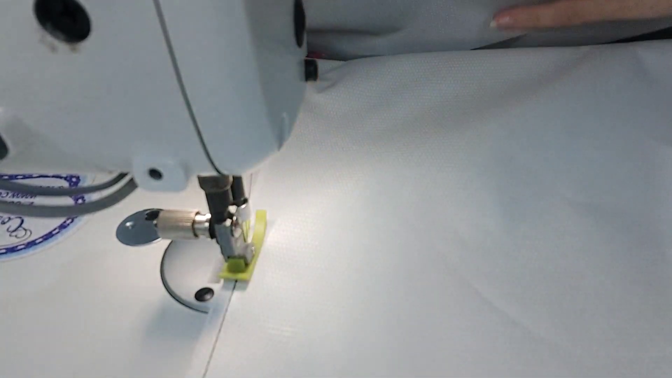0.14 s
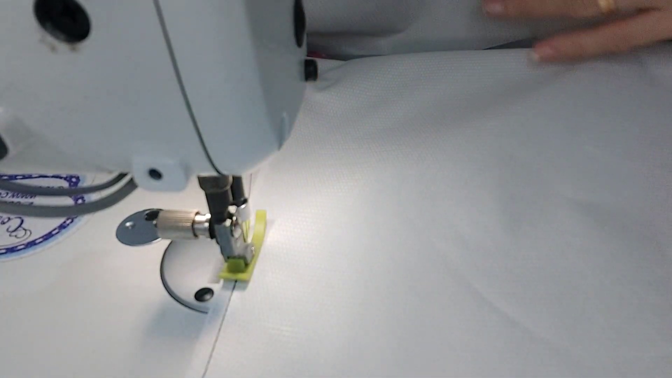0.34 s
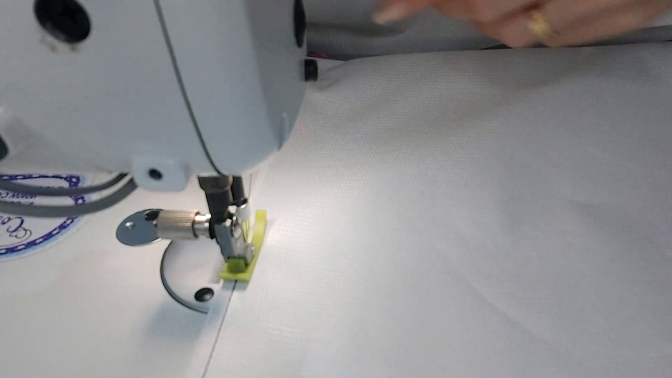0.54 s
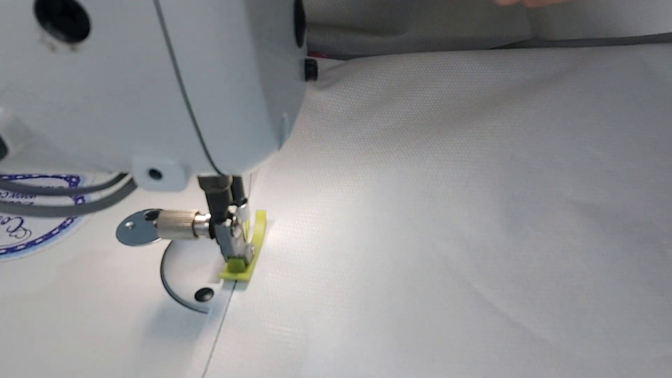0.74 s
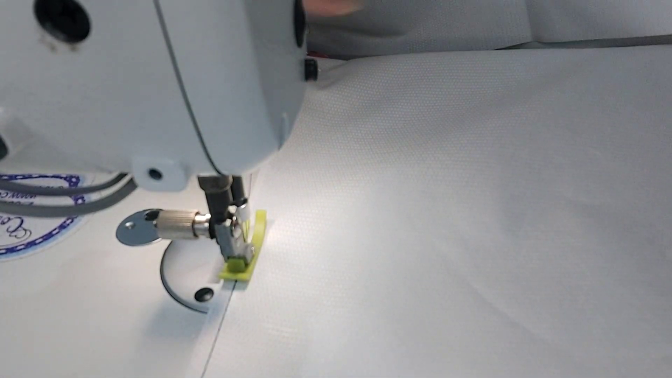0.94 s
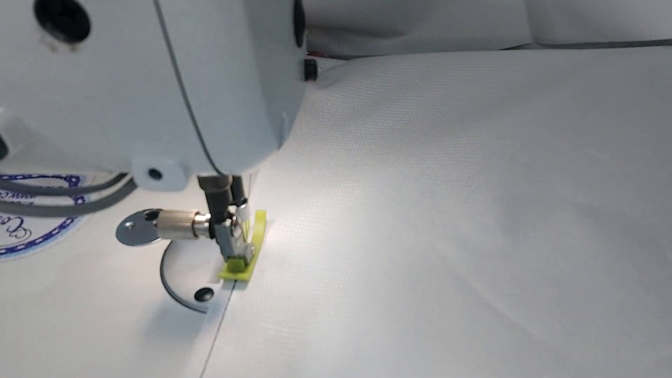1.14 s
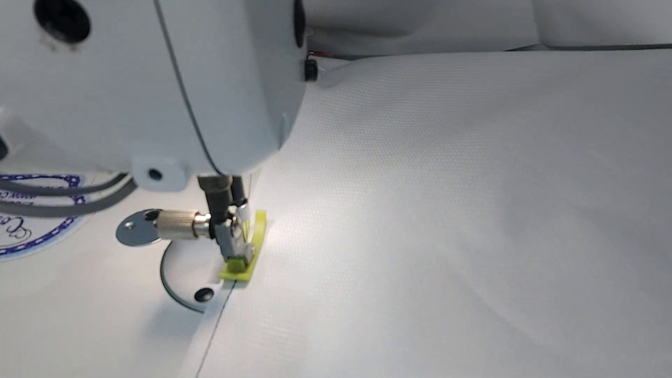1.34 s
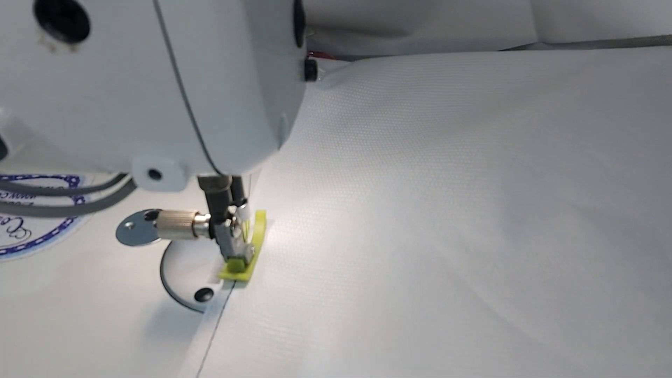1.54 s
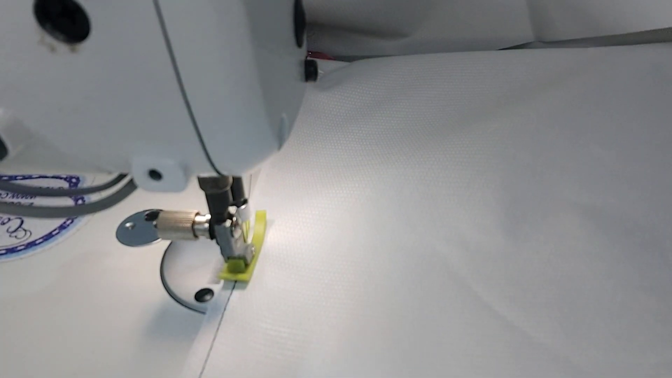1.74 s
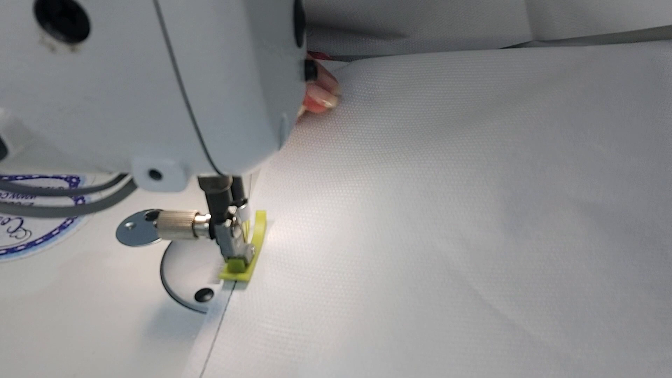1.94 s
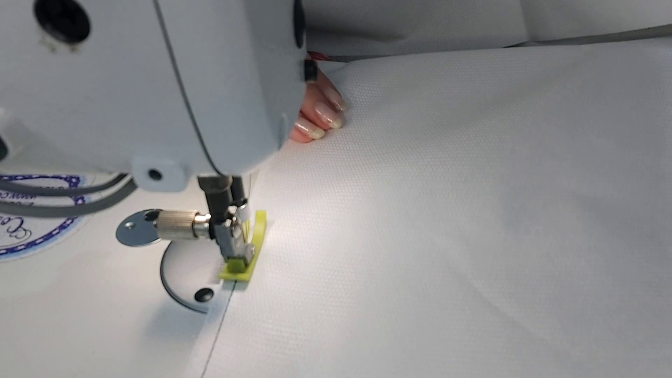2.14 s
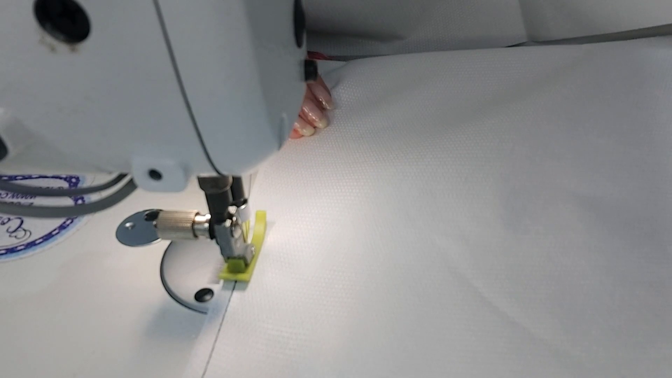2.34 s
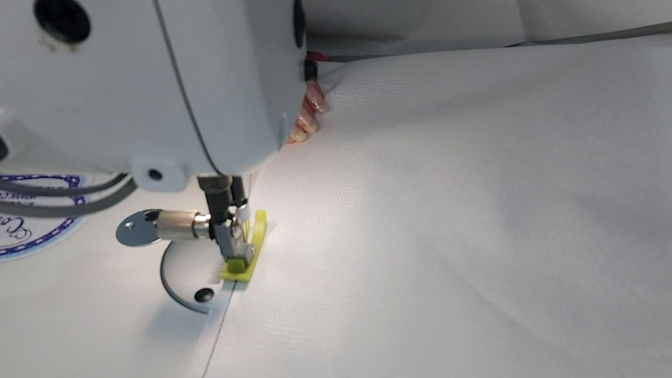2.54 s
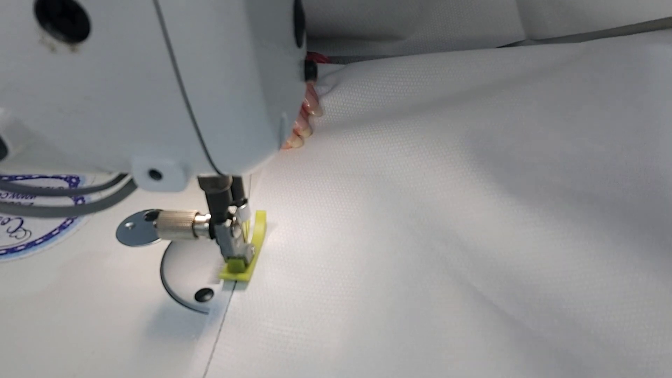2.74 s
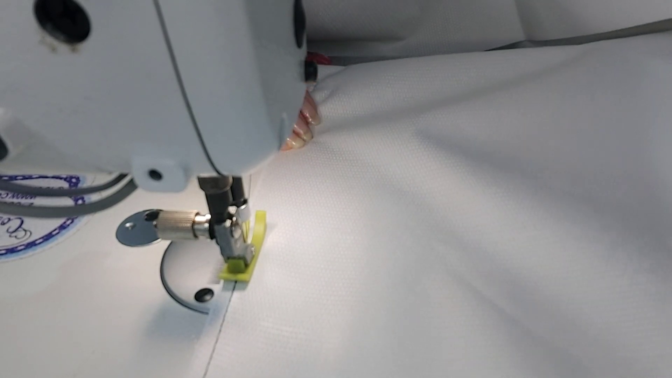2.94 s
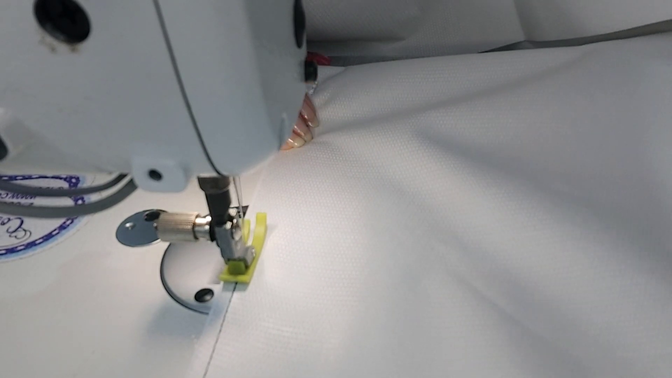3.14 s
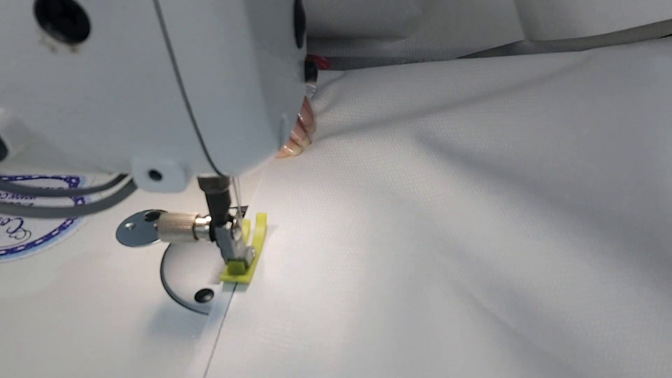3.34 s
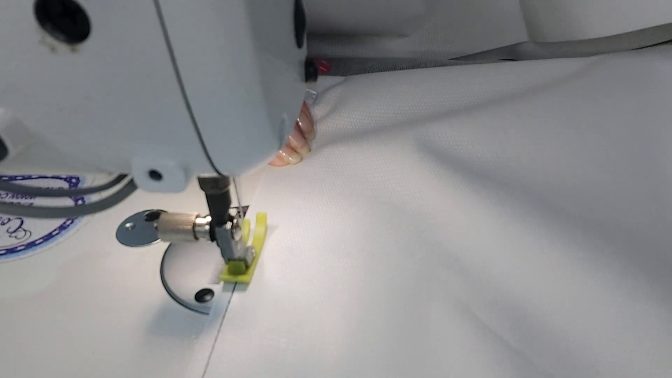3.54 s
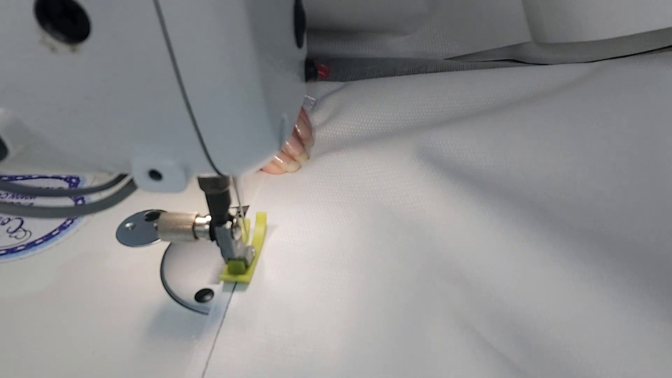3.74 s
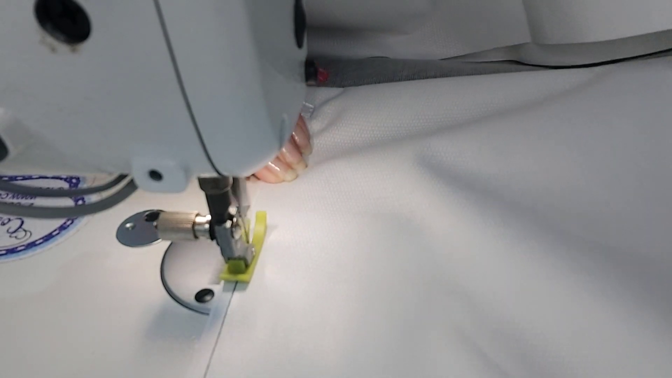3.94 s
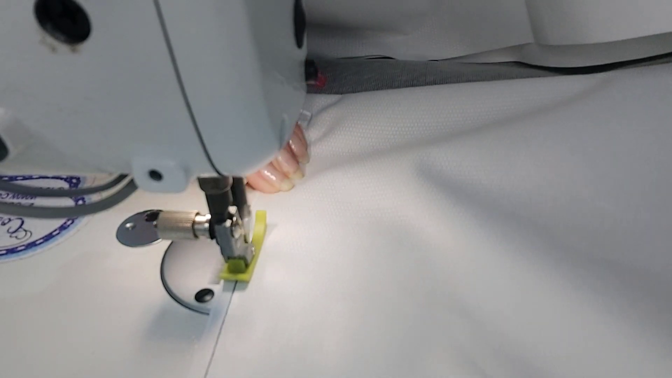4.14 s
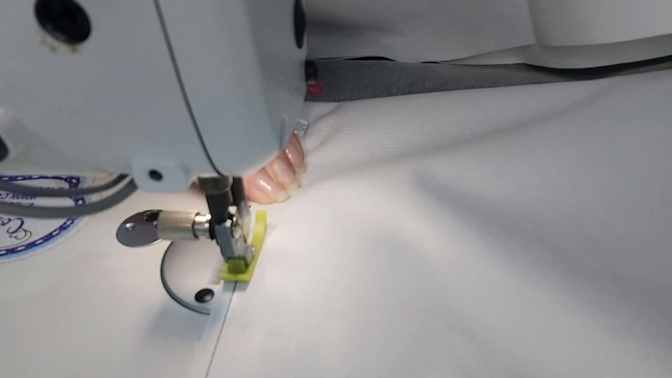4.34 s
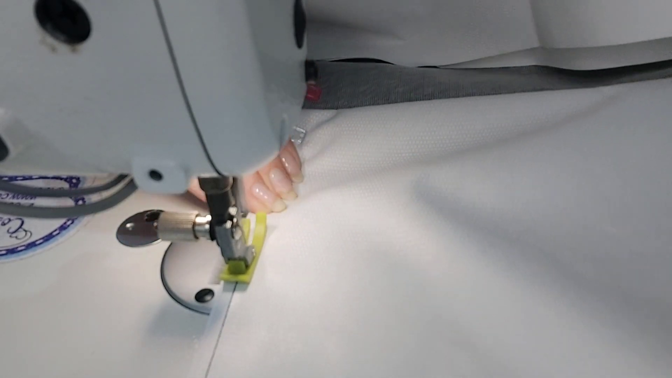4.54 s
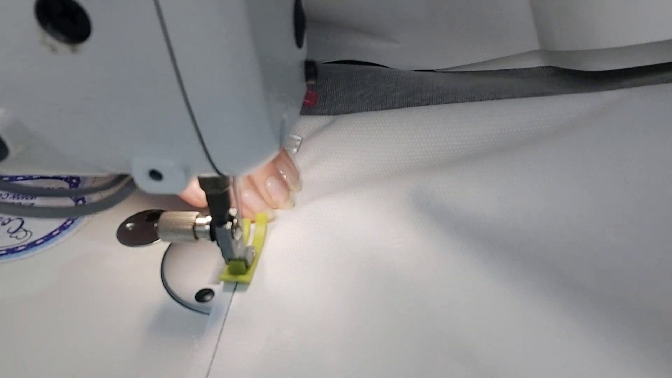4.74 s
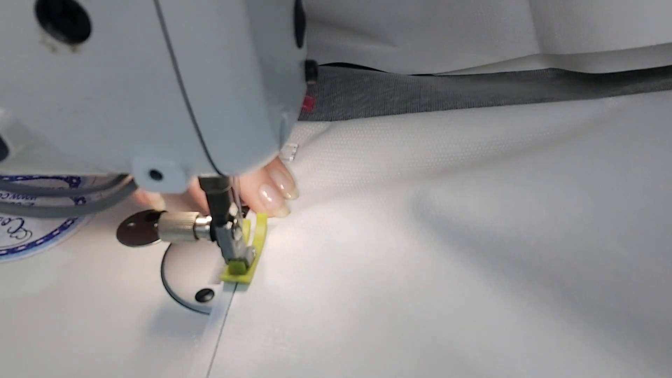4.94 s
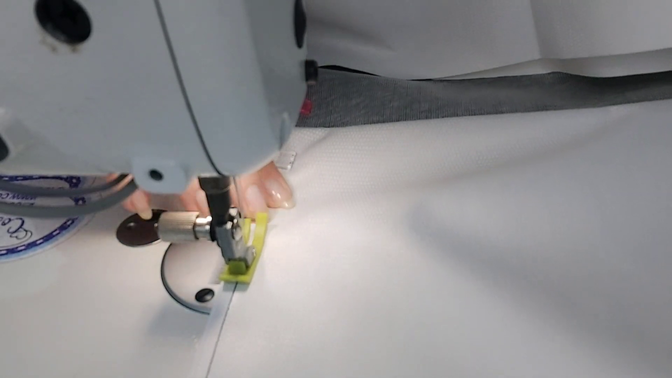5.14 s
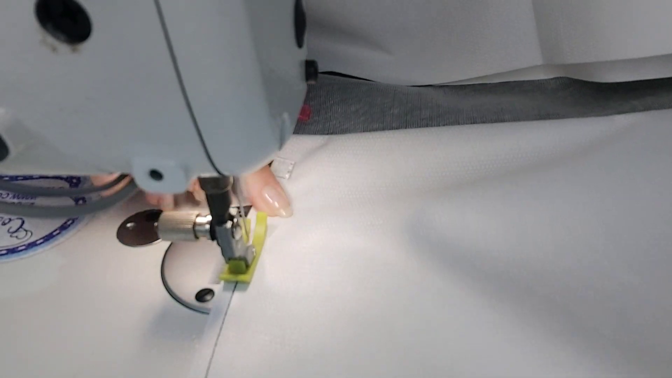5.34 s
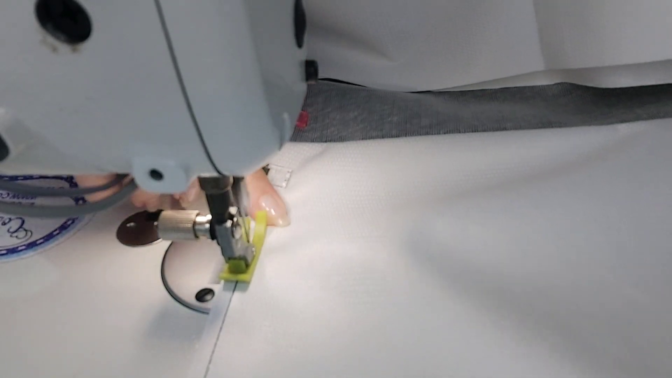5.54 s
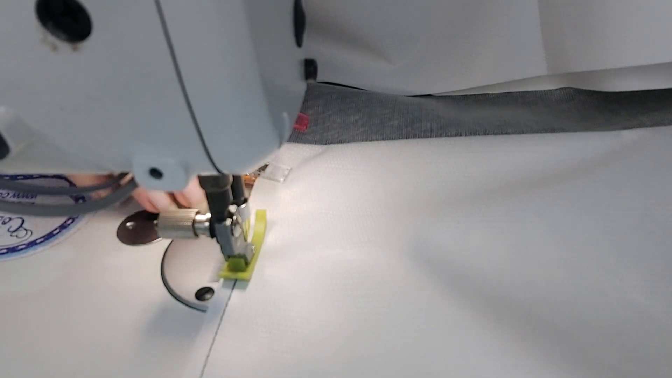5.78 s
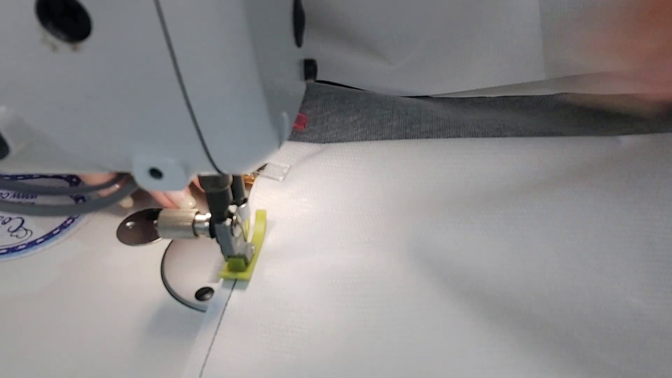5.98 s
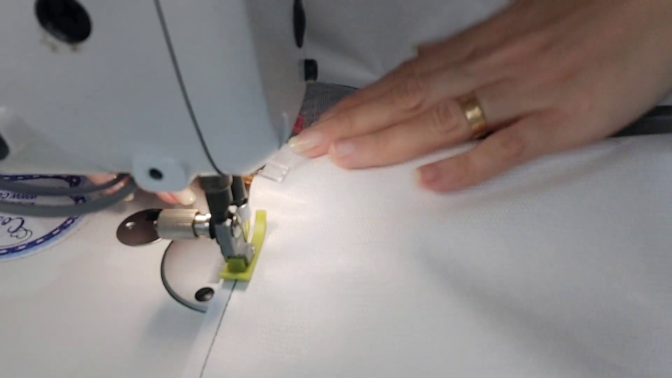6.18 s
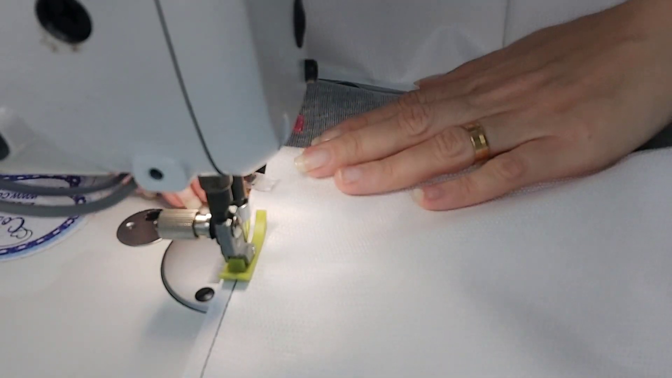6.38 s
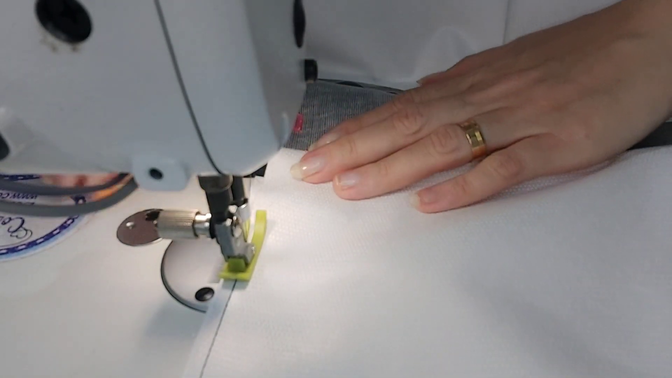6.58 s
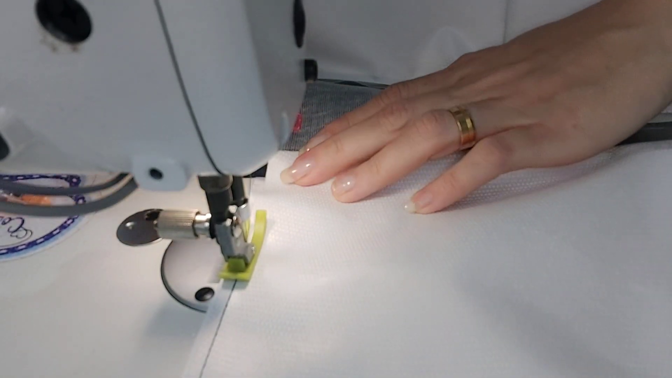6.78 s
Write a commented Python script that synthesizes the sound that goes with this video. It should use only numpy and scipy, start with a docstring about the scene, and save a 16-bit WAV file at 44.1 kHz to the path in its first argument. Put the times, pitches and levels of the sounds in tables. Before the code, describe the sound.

Soft fabric rustles and light knocks over faint hum, then about two seconds of rapid, clattering machine stitching, a heavy stop, and tiny metallic clinks.

```python
"""Hands slide over cloth, among small ticks and dull knocks, above a mains hum and quiet room air. Close to a
stereo microphone an industrial sewing machine then sews 25 stitches, about eleven a second, and brakes; hands
and cloth return and steel snips clink. Impacts are force pulses driving damped modes or decaying bands of
noise. Each stitch is a click, a rattle, a knock in the arm, a thump in the table and a bright fizz; gears whirr
as noise and sing steady tones."""
import sys
import numpy as np
from scipy import signal
from scipy.fft import rfft, irfft, next_fast_len
from scipy.io import wavfile
from scipy.ndimage import uniform_filter1d

SR = 44100
rng = np.random.default_rng(int(sys.argv[2]) if len(sys.argv) > 2 else 0)


def wav_out(sig):
    """Save sig, one row per channel (or a flat mono array), as 16-bit PCM at SR to the path in sys.argv[1]."""
    wavfile.write(sys.argv[1], SR, np.round(np.clip(np.atleast_2d(sig).T, -1, 1) * 32767).astype(np.int16))


N = 300321
TIME = np.arange(N) / SR  # s
SIDES = np.array([[.5], [-.5]])  # left and right halves of a level or phase difference

# Levels are settings before any trim in the functions; mode t60 is before the share that ring() keeps of it.
# One row a stitch, in order: [knock level/dB, low arm ring above high/dB, fizz delay after the click t/ms,
# fizz level/dB, loudest clack delay t/ms, clack level/dB]
STITCH_ROWS = [(-33, -2, 65, -25, 17, -33), (-41, -8, 55, -27.5, 14, -36), (-34, 5, 57, -30, 33, -28),
               (-38, 3, 62, -30, 23, -30), (-35, 1, 47, -34, 10, -29), (-36, 2, 56, -36, 25, -30),
               (-37, 3, 58, -33, 21, -30), (-31, -3, 53, -35, 33, -27), (-29, -3, 63, -25, 17, -28),
               (-30.5, -2, 62, -32, 7.6, -31), (-34, -12, 61, -28, 18, -27), (-30, -1, 59, -26, 17, -32),
               (-35, 9, 61, -33, 24, -28), (-29, -4, 54, -31, 20, -30), (-33, -16, 50, -36, 17, -32),
               (-39, -1, 60, -31, 10, -33), (-30, 2, 68, -29, 33, -30), (-29, -5, 66, -24.5, 18, -32),
               (-34, 3, 50, -32, 22, -27), (-36, 11, 62, -27, 33, -29), (-30, 1, 59, -30, 20, -29),
               (-39, -2, 64, -28, 22, -30), (-29, 1, 52, -33, 17, -29), (-29, 5, 62, -28, 16, -30),
               (-31, 4, 50, -38, 20, -27)]
# Loose parts after the click: [delay t/ms, level/dB relative to the rattle]
RATTLE_BLOWS = [(9, 2.5), (14, -1.5), (21, -2), (27, -1.5), (34, -11)]
# Blows in the arm, the main one a quick chatter: [delay t/ms, level/dB relative to the knock]
ARM_BLOWS = [(9, -15), (14.5, -13), (18.7, -3), (20.4, -1), (22.1, -3), (57.5, -4)]
# Blows into the table: [delay t/ms, level/dB relative to the thump]
TABLE_BLOWS = [(43, -3.5), (53, -5.5)]
# Modes of the table, the frame struck by the brake, and the steel snips: [f/Hz, level/dB, t60/s]
TABLE_MODES = [(74, -15, 0.15), (100.3, -6.5, 0.17), (174.5, -2.5, 0.15), (190.4, 4.5, 0.15),
               (268, -5, 0.031)]
FRAME_MODES = [(70, -17, .1), (142, -8, .09), (250, 0, .06), (355, -5, .13), (430, -9, .1), (600, -6, .07),
               (807, -12, .06), (1100, -12, .09), (1716, -18, 1.3), (4300, -12, .05)]
SNIP_MODES = [(3044, -30, 0.13), (4270, -19, 0.02), (5320, -15, 0.067), (7300, -24, .1), (8340, -26, .03),
              (9400, -1.5, .04), (11200, -7, 0.04), (11790, -8, 0.054), (12800, -16, .015),
              (14150, -5, 0.035)]
# Modes of the small steel levers, the dull housing and the jingling steel parts: [f/Hz, level/dB, t60/s]
LEVER_MODES = [(1105, -15, 0.064), (1355, -14.5, 0.065), (1734, -14, 0.18), (2157, -6.5, 0.055),
               (2505, -11, 0.059), (2767, -11.5, 0.048), (4230, -6.5, 0.024), (5500, -5, 0.024),
               (8460, -4.5, 0.025), (8990, -3, 0.037), (11470, -4.5, 0.032)]
HOUSING_MODES = [(535, -10.5, 0.037), (568, -0.5, 0.018), (786, -18, 0.042), (1235, -10, 0.033),
                 (1804, -19.5, 0.05), (2530, -25.5, 0.046)]
JINGLE_MODES = [(3900, -20, .02), (4680, -10, 0.22), (5250, -14, .03), (9200, -3, .02), (10300, -2, .025),
                (11600, -2, .02), (12800, -4, .02), (14200, -9, .015)]
# The small part that ticks at each click: [f/Hz, level/dB relative to the click, t60/s]
CATCH_MODES = [(5460, -7.5, 0.029)]
# Low pair of the stand, struck in opposite senses so that it beats: [f/Hz, level/dB, t60/s]
STAND_MODES = [(238.5, -8, .55), (266.3, -9, .55)]
# Lower and upper modes of the arm: [f/Hz, level/dB, t60/s]
ARM_LOW_MODES = [(500, -9, .1), (521, -2, .2)]
ARM_HIGH_MODES = [(598, -2, .2), (622, -6, .14)]
# A part closes on the arm and stifles its ring: [time after the click t/ms, level/dB]
ARM_DAMPING = [(35, 0), (41, -9)]
# Narrow tones of the turning gears: [f/Hz, width/Hz before the share of t60, level/dB relative to the whirr]
GEAR_TONES = [(8860, 70, -20)]
# Steady tones of the meshing gears: [f/Hz, level/dB relative to the whirr]
MESH_TONES = [(521, -12), (374, -6), (428, -10), (1716, -14)]
# Course of the running gear train: [t/s, level/dB]
WHIRR_COURSE = [(3.08, -48), (3.125, -57), (3.14, -46.5), (3.29, -45.5), (3.31, -40.5), (5.6, -39.5),
                (5.68, -41.5), (5.76, -56.5), (5.849, -65)]
# Relative noise spectra of click, fizz, metal (whirr and rattle), rumble, cloth and air: [f/Hz, level/dB per Hz]
CLICK_COLOUR = [(1000, -5), (4000, -8), (5100, -16), (5500, 1), (5900, -6.5), (7000, -8.5), (8800, -6),
                (15500, -9)]
FIZZ_COLOUR = [(3000, -16), (7500, -8), (8500, 2), (8850, 7), (9200, -1), (10500, -6.5), (15500, -14)]
METAL_COLOUR = [(410, -9), (700, -0.5), (747, -11), (1360, 1.5), (1530, -6.5), (1740, 0.5), (2150, 0.5),
                (2350, -4), (4230, -3.5), (5490, -10), (6950, -11.5), (8670, -1.5), (9630, -5.5),
                (15800, -11.5)]
RUMBLE_COLOUR = [(50, -40), (81, -10.5), (129, -13), (189, 1), (222, -10), (290, -7), (350, -16),
                 (445, -13), (560, -7), (760, -31)]
BRIGHT_CLOTH_COLOUR = [(4000, -16.5), (5400, -11.5), (6700, -18), (8000, -10.5), (10200, -4.5), (12000, -6),
                       (15800, -16)]
DULL_CLOTH_COLOUR = [(200, -1), (300, 0), (528, 2), (981, -9), (1490, -8), (2110, -9.5), (4500, -14),
                     (7500, -21.5), (10000, -27)]
AIR_COLOUR = [(30, -52), (60, -32), (108, -16.5), (203, -22), (238, -19), (271, -18.5), (392, -27),
              (581, -29), (1100, -36.5), (6500, -48.5), (11500, -52), (15000, -52), (15800, -68)]
# The table takes the first pull: [t/s, level/dB]
START_BLOWS = [(3.095, -45.5), (3.234, -40), (3.258, -38)]
# Dull knocks on the machine housing, clinks of the snips, jingles of small steel parts: [t/s, level/dB]
HOUSING_BLOWS = [(.011, -32.5), (0.015, -33.5), (0.044, -36.5), (0.049, -36), (0.055, -36), (0.135, -27),
                 (0.17, -31), (0.352, -38), (0.589, -43.5), (.066, -38), (1.485, -45), (2.647, -36.5),
                 (2.693, -40.5), (3.152, -35), (3.185, -33.5), (3.202, -28.5), (6.315, -39.5)]
CLINK_BLOWS = [(6.7195, -50), (6.746, -27), (6.7755, -37), (6.781, -29), (6.807, -36)]
JINGLE_BLOWS = [(1.3725, -33), (1.376, -32), (1.383, -25), (1.391, -30), (1.397, -29.5), (1.448, -37),
                (1.457, -37)]
# Broad clacks, most as the machine starts and stops, and a bright crackle: [t/s, level/dB]
CLACK_EVENTS = [(.854, -50), (2.045, -49.5), (3.077, -37.5), (3.098, -49), (3.133, -33), (3.144, -32.5),
                (3.157, -36), (3.184, -36), (3.219, -32.5), (5.645, -29), (5.69, -35), (6.316, -34)]
CRACKLE_EVENTS = [(1.372, -30), (1.383, -26.5), (1.45, -32.5)]
# Ticks: [t/s, level/dB, centre f/Hz]
TICK_EVENTS = [(0.043, -50, 4000), (0.137, -47, 1500), (.339, -45.5, 10600), (0.832, -36, 11200),
               (1.713, -52, 3000), (2.178, -45, 3500), (2.647, -47.5, 1700), (3.005, -46, 11300),
               (5.623, -41, 4100), (5.69, -29.5, 4040), (5.706, -35, 4270), (6.413, -32, 1740),
               (6.413, -29.5, 12400), (6.706, -35.5, 10400), (6.718, -38, 10500), (6.745, -22.5, 11800)]
# Hands sliding over cloth: [start t/s, end t/s, bright level/dB, dull level/dB]
CLOTH_SLIDES = [(0, 0.08, -47.5, -46), (0.103, 0.204, -64.5, -52), (0.264, 0.377, -66, -61),
                (0.58, 0.614, -79, -55.5), (1.24, 1.398, -73, -61), (1.394, 1.486, -40.5, -58),
                (1.553, 1.783, -72, -61), (1.849, 1.934, -60, -51.5), (2.112, 2.31, -63.5, -57),
                (2.474, 2.58, -63.5, -86), (2.637, 2.732, -75, -61), (2.765, 2.832, -66, -68),
                (5.817, 5.877, -52.5, -49.5), (5.891, 6.062, -76, -56), (6.152, 6.294, -53.5, -49),
                (6.305, 6.45, -58.5, -54), (6.518, 6.67, -56.5, -68), (6.71, 6.83, -56, -66)]
# Mains hum: [f/Hz, rms level/dB before waver and panning]
HUM_TONES = [(120, -75), (240, -53), ]
# How the two channels hear a ringing part: [f/Hz, left minus right level/dB, left leads/rad]
MACHINE_PLACE = [(90, 2, -0.28), (250, 4, 0.63), (378, -7, -1.5), (547, -1.3, -1.02), (1340, -0.5, -0.31),
                 (2100, 1.5, -1.74), (4870, -2, -1.73), (7650, -8.5, -1.1), (10000, 4, -1.74)]
HAND_PLACE = [(497, 3, 0.88), (3000, -15.5, 5.9), (5560, -10.5, 2.54), (9600, 6.5, 0.92), (12900, -6, 1.9)]

FIRST_STITCH_S, STITCH_S, QUICKER_S = 3.3005, .09448, .0000416  # each interval is a little shorter than the last
CLICK_DB, RATTLE_DB, THUMP_DB = -26, -32, -29.5  # typical levels, from which the stitches scatter
CLICK_SPREAD_DB, RATTLE_SPREAD_DB, THUMP_SPREAD_DB = 1, 2.0, 0.47
LAST_THUMP_DB = -4  # the last stitch lands softer
USUAL_KNOCK_DB, RATTLE_SHARE, THUMP_SHARE = -35.5, 0.18, -0.15  # harder knock: more rattle, less thump (dB per dB)
LEVER_SPREAD_DB = 3.0  # no two contacts strike the levers at the same spot
BRAKE_S, BRAKE_DB, STAND_LAG_S = 5.645, -18.5, .004  # the jolt reaches the stand a little later
TICK_WIDTH_HZ, TICK_WIDEST, TICK_T60_S = 3900, 0.69, 0.027  # the width is at most this many times the centre
CLACK_HZ, CLACK_WIDTH_HZ, CLACK_T60_S = 6600, 10500, 0.032
CRACKLE_HZ, CRACKLE_WIDTH_HZ, CRACKLE_T60_S = 10800, 2300, 0.14
JINGLE_PAN_DB = 6.5  # added to the place of the hands
RUSTLE_DB, AIR_DB, WALLS_DB = -70, -62, -12  # faint bright stirring of cloth; room air; wall return
TOP_HZ = 15800


def stitches():
    """Periodic excitation: every stitch repeats one train of contacts, with chance in timing and strength."""
    knock, low, fizz_ms, fizz, clack_ms, clack = np.array(STITCH_ROWS, float).T[:, :, None]
    k = np.arange(len(STITCH_ROWS))[:, None]
    starts = FIRST_STITCH_S + STITCH_S * k - QUICKER_S * k ** 2 / 2
    uneven = rng.standard_normal((3, len(starts), 1))
    excess = knock - USUAL_KNOCK_DB
    click = CLICK_DB + CLICK_SPREAD_DB * uneven[0]
    rattle = RATTLE_DB + RATTLE_SPREAD_DB * uneven[1] + RATTLE_SHARE * excess
    thump = THUMP_DB + THUMP_SPREAD_DB * uneven[2] + THUMP_SHARE * excess
    thump[-1] += LAST_THUMP_DB
    fizz_s = starts + fizz_ms / 1000
    clack_s = starts + clack_ms / 1000

    out = stitch_clicks(starts, click) + stitch_rattles(starts, rattle, clack_s, clack)
    out += stitch_fizzes(fizz_s, fizz)
    # every contact also rings the levers; the loose parts strike them at their own scattered moments
    loose_ms, loose_db = np.transpose(RATTLE_BLOWS)
    slop_ms = 2.5 * rng.standard_normal((len(starts), len(RATTLE_BLOWS)))
    when = np.hstack([starts, fizz_s, clack_s, starts + (loose_ms + slop_ms) / 1000])
    hard = np.hstack([click - 7, fizz - 4, clack - 1.5, rattle - 3 + loose_db])
    return out + stitch_levers(when, hard) + arm_knocks(starts, knock, low) + table_thumps(starts, thump)


def stitch_clicks(starts, click):
    """Impulsive contact: decaying noise with a hard tap that rings the catch."""
    burst = fade(blows(starts, click, 2.5), 0.042) * noise(CLICK_COLOUR)
    return burst + ring(blows(starts, click, .04), CATCH_MODES, MACHINE_PLACE)


def stitch_rattles(starts, rattle, clack_s, clack):
    """Repeated impact: loose parts and the loudest clack excite decaying, uneven metallic noise."""
    force = train(starts, RATTLE_BLOWS, rattle - 3.5, 1.37, 2.6, 0.6) + blows(clack_s, clack - 3.5, 0.51)
    return fade(force, 0.066) * grit(400, 0.7) * noise(METAL_COLOUR, 590, MACHINE_PLACE)


def stitch_fizzes(fizz_s, fizz):
    """Broadband radiation: each pulse opens bright noise that decays exponentially."""
    return fade(blows(fizz_s, fizz, 0.77), 0.07) * noise(FIZZ_COLOUR)


def stitch_levers(when, hard):
    """Modal excitation by striking point: each contact drives each lever mode with chance strength."""
    spot = LEVER_SPREAD_DB * rng.standard_normal((len(when), len(LEVER_MODES), hard.shape[1]))
    out = np.zeros((2, N))
    for j, mode in enumerate(LEVER_MODES):
        out += ring(blows(when, hard + spot[:, j], 0.025), [mode], MACHINE_PLACE)
    return out


def arm_knocks(starts, knock, low):
    """Damped resonance: a chatter of blows rings the arm until a closing part absorbs its vibration."""
    arm = np.zeros((2, N))
    for modes, sign in [(ARM_LOW_MODES, 1), (ARM_HIGH_MODES, -1)]:
        force = train(starts, ARM_BLOWS, knock + sign * low / 2, 0.1, 0.88, 0.94)
        arm += ring(force, modes, MACHINE_PLACE)
    latest = np.maximum(np.searchsorted(starts[:, 0], TIME) - 1, 0)
    since_ms = 1000 * (TIME - starts[latest, 0])
    return arm * undb(np.interp(since_ms, *np.transpose(ARM_DAMPING)))


def table_thumps(starts, thump):
    """Low-mode excitation: soft, long pulses drive the table, in the negative sense."""
    return -ring(train(starts, TABLE_BLOWS, thump, 0.15, .6, 2.6), TABLE_MODES, MACHINE_PLACE)


def drive():
    """Superposition: gear noise and steady gear tones follow one running level, framed by the first pull and
    the brake."""
    run = undb(np.interp(TIME, *np.transpose(WHIRR_COURSE), -150, -150))
    first_pull = -ring(blows(*np.transpose(START_BLOWS), 1.2), TABLE_MODES, MACHINE_PLACE)
    return gear_train(run) + gear_mesh(run) + first_pull + brake()


def gear_train(run):
    """Random excitation: turning gears make metallic whirr, rumble and narrow resonant tones."""
    whirr = undb(2.03) * grit(300, 3.1) * noise(METAL_COLOUR, 620, MACHINE_PLACE)
    rumble = undb(-1.0) * noise(RUMBLE_COLOUR)
    out = run * (whirr + rumble)
    for hz, width_hz, db in GEAR_TONES:
        t60 = np.log(1000) / (np.pi * width_hz)
        # this factor brings the noise-driven mode to an rms near 1
        unit = np.sqrt(4 * np.log(1000) / (t60 * SR))
        force = run * (run > 1e-6) * rng.standard_normal(N) * unit
        out += ring(force, [(hz, db, t60)], MACHINE_PLACE)
    return out


def gear_mesh(run):
    """Tonal radiation: sinusoids of fixed frequency waver in level and follow the running level."""
    return sum(run * undb(db) * grit(15, 3.3) * np.sin(2 * np.pi * hz * TIME) for hz, db in MESH_TONES)


def brake():
    """Transmitted impact: the blow rings the frame, then two close stand modes beat in opposition."""
    blow = blows(BRAKE_S, BRAKE_DB, 0.68)
    jolt = np.roll(blow, int(STAND_LAG_S * SR))
    stand = ring(jolt, STAND_MODES[:1], MACHINE_PLACE) - ring(jolt, STAND_MODES[1:], MACHINE_PLACE)
    return ring(blow, FRAME_MODES, MACHINE_PLACE) + stand


def steel():
    """Modal ringing of small steel: snips clink, parts jingle, and clacks sound the levers."""
    clinks = one_by_one(CLINK_BLOWS, SNIP_MODES, .9, .03, 1.5, 0.08)
    jingle = one_by_one(JINGLE_BLOWS, JINGLE_MODES, 0.86, .03, 2.5, 0.064) * undb(SIDES * JINGLE_PAN_DB)
    clacks = one_by_one(CLACK_EVENTS, LEVER_MODES, 0.57, 0.038, 5.65, place=MACHINE_PLACE)
    return clinks + jingle + undb(-4.0) * clacks


def housing_knocks():
    """Heavily damped resonance: soft blows sound the short modes of the machine housing."""
    return one_by_one(HOUSING_BLOWS, HOUSING_MODES, 0.97, 0.28, 3.0)


def ticks():
    """Band-limited transients: ticks, clacks and crackle are short noise bursts, a little to the left."""
    out = np.zeros((2, N + SR))
    t = np.arange(SR // 4) / SR
    bursts = [(s, db, hz, min(TICK_WIDTH_HZ, TICK_WIDEST * hz), TICK_T60_S) for s, db, hz in TICK_EVENTS]
    bursts += [(s, db, CLACK_HZ, CLACK_WIDTH_HZ, CLACK_T60_S) for s, db in CLACK_EVENTS]
    bursts += [(s, db, CRACKLE_HZ, CRACKLE_WIDTH_HZ, CRACKLE_T60_S) for s, db in CRACKLE_EVENTS]
    for s, db, hz, width_hz, t60 in bursts:
        edges = np.clip([hz - width_hz / 2, hz + width_hz / 2], 600, .45 * SR)
        band = signal.butter(2, edges, "bandpass", fs=SR, output="sos")
        burst = signal.sosfilt(band, rng.standard_normal((2, len(t))))
        shape = np.minimum(t / 0.00083, 1) * 1000. ** (-t / t60)
        start = int(s * SR)
        out[:, start:start + len(t)] += undb(db + SIDES * 2.6) * shape * burst / burst.std()
    return out[:, :N]


def cloth():
    """Friction noise: each slide swells and dies in two colours of grainy hiss, nearer the left."""
    bright, dull = np.zeros((2, N))
    for start, end, bright_db, dull_db in CLOTH_SLIDES:
        soft = 0.3 * (end - start)
        swell = np.interp(TIME, [start - soft, start + soft], [0, 1])
        shape = swell * np.exp(-np.maximum(TIME - end + soft, 0) / (1.45 * soft))
        bright = bright + undb(bright_db) * shape
        dull = dull + undb(dull_db) * shape
    bright = bright + undb(RUSTLE_DB) * grit(12, 4.0)
    bright_hiss = bright * grit(90, 2.1) * grit(500, 1.3) * noise(BRIGHT_CLOTH_COLOUR)
    dull_hiss = dull * grit(50, 2.7) * grit(300, 2.1) * noise(DULL_CLOTH_COLOUR)
    return (bright_hiss + dull_hiss) * undb(SIDES * 2.8)


def walls(near):
    """Diffuse reverberation: a decaying noise response, different in each channel above the bass."""
    t = np.arange(SR // 2) / SR
    colour = [(150, -4.5), (600, 0.5), (15000, -8.0)]  # f/Hz, level/dB per Hz
    tail = noise(colour, 450)[:, :len(t)] * 1000. ** (-t / 0.46) * (t > .004)
    tail = tail / np.sqrt(np.sum(tail ** 2) / 2)
    return undb(WALLS_DB) * signal.fftconvolve(near.mean(axis=0, keepdims=True), tail, axes=1)[:, :N]


def workroom():
    """Stationary background: mains hum of slightly wavering level over steady coloured air noise."""
    hum = np.zeros(N)
    for hz, db in HUM_TONES:
        hum += undb(db) * np.sqrt(2) * grit(11, 1.0) * np.sin(2 * np.pi * (hz * TIME + rng.random()))
    return hum * undb(SIDES * 3.8) + undb(AIR_DB + SIDES * 4.9) * noise(AIR_COLOUR, 380)


def train(starts, parts, db, slop_ms, spread_db, push_ms):
    """Repeated forcing: the same delayed blows follow every start, scattered in time and level."""
    ms, part_db = np.transpose(parts)
    chance = rng.standard_normal((len(starts), 2, len(ms)))
    when = starts + (ms + slop_ms * chance[:, 0]) / 1000
    return blows(when, db + part_db + spread_db * chance[:, 1], push_ms)


def one_by_one(events, modes, share, push_ms, spread_db, scrape=0., place=HAND_PLACE):
    """Modal variability: mode strengths differ from blow to blow; steel on steel scrapes as it lands."""
    out = 0
    for s, db in events:
        struck = [(hz, g + spread_db * rng.standard_normal(), t60) for hz, g, t60 in modes]
        force = blows(s, db, push_ms)
        if scrape:
            force = force + scrape * fade(force, 0.043) * (TIME < s + .05) * rng.standard_normal(N)
        out = out + ring(force, struck, place, share)
    return out


def ring(force, modes, place, share=0.93):
    """Damped oscillation: each mode is a complex resonator with interchannel level and phase by place."""
    out = np.zeros((2, N))
    busy = np.flatnonzero(force)
    a = busy[0]
    b = min(N, busy[-1] + int(share * max(m[2] for m in modes) * SR))
    f, pan_db, lead = np.transpose(place)
    for hz, db, t60 in modes:
        pole = np.exp(2j * np.pi * hz / SR - np.log(1000) / (t60 * share * SR))
        z = signal.lfilter([1], [1, -pole], force[a:b])
        level = undb(db + SIDES * np.interp(hz, f, pan_db))
        phase = np.exp(1j * SIDES * np.interp(hz, f, lead))
        out[:, a:b] += np.imag(z * level * phase)
    return out


def blows(times, db, push_ms):
    """Contact duration: force pulses are half a sine long; a softer contact pushes longer."""
    x = np.zeros(N)
    np.add.at(x, np.clip((np.ravel(times) * SR).astype(int), 0, N - 1), np.ravel(undb(db)))
    length = max(push_ms * SR / 1000, 1)  # samples
    push = np.sin(np.pi * np.arange(.5, length) / length)
    return np.convolve(x, push / push.sum())[:N]


def fade(x, t60):
    """Exponential decay: each pulse starts an envelope that falls 60 dB in t60 seconds."""
    return signal.lfilter([1], [1, -np.exp(-np.log(1000) / (t60 * SR))], x)


def grit(rate, spread_db):
    """Random modulation: levels held 1 / rate s and slewed give uneven contact; rms 1."""
    k = int(SR / rate)
    held = np.repeat(rng.standard_normal(N // k + 1), k)
    g = undb(spread_db * uniform_filter1d(held, k)[:N])
    return g / np.sqrt(np.mean(g ** 2))


def noise(colour, alike_hz=800, place=((1, 0, 0),)):
    """Interchannel coherence: coloured stereo noise of rms 1, left and right alike in the bass only."""
    size = next_fast_len(N)
    hz = np.arange(1, size // 2 + 2) * SR / size
    f, db = np.transpose(colour)
    mid, side = rfft(rng.standard_normal((2, size)))
    apart = 1 / np.sqrt(1 + (alike_hz / hz) ** 3)
    pan_db = np.interp(hz, *np.transpose(place)[:2])
    gain = undb(np.interp(np.log(hz), np.log(f), db) + SIDES * pan_db)
    x = irfft((mid + 2 * SIDES * apart * side) * gain, size)[:, :N]
    return x / np.sqrt(np.mean(x ** 2))


def undb(db):
    """Logarithmic level: decibels become an amplitude ratio."""
    return 10 ** (np.asarray(db, float) / 20)


def scene():
    """Linear superposition: near sources and their wall return add to cloth and background."""
    near = stitches() + drive() + steel() + housing_knocks() + ticks()
    # table and microphone pass little under the lowest modes
    near = signal.sosfilt(signal.butter(3, 60, "highpass", fs=SR, output="sos"), near)
    return near + walls(near) + cloth() + workroom()


def record(dry):
    """Band limitation: the recorder's steep elliptic low-pass cuts the top."""
    return signal.sosfilt(signal.ellip(10, .2, 70, TOP_HZ, fs=SR, output="sos"), dry)


dry = scene()
out = record(dry)
wav_out(out)
```